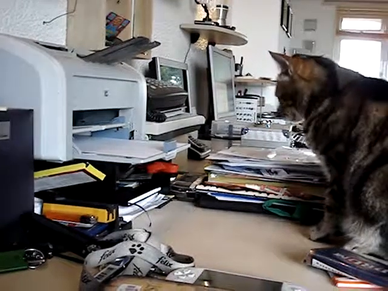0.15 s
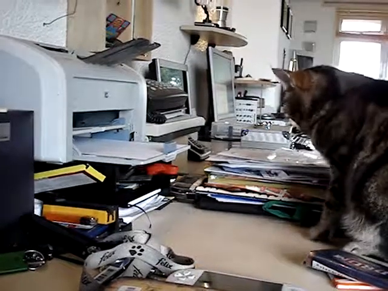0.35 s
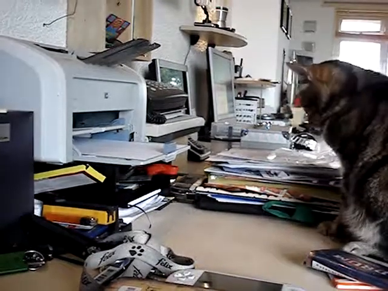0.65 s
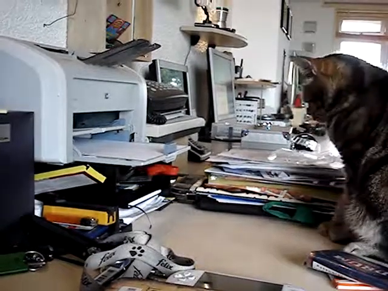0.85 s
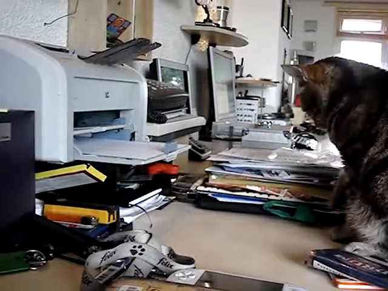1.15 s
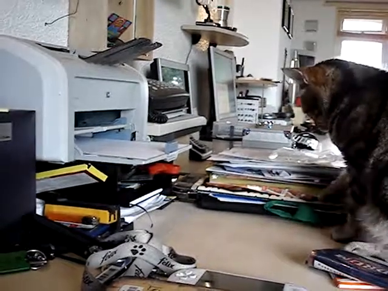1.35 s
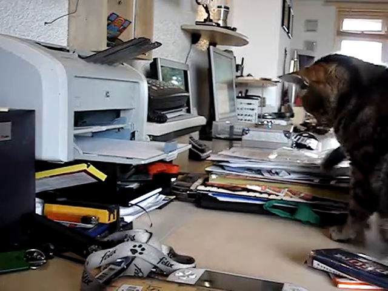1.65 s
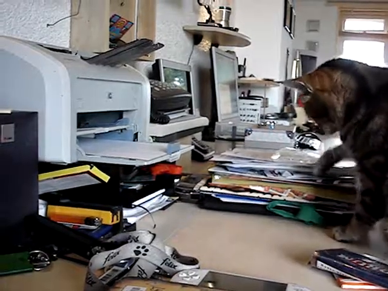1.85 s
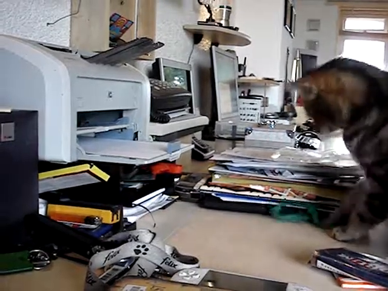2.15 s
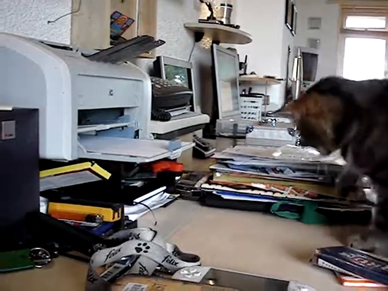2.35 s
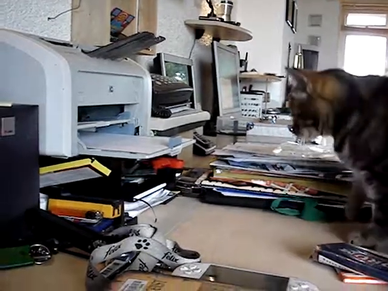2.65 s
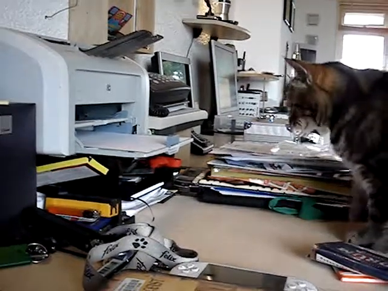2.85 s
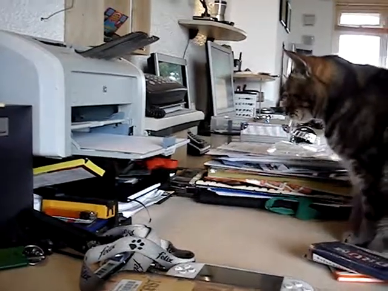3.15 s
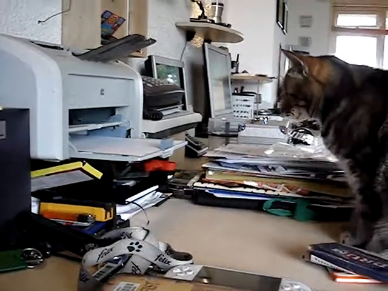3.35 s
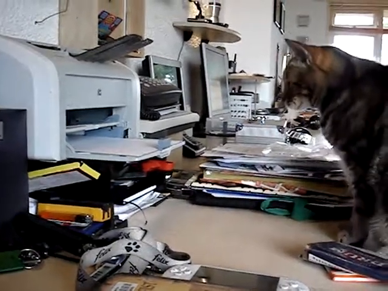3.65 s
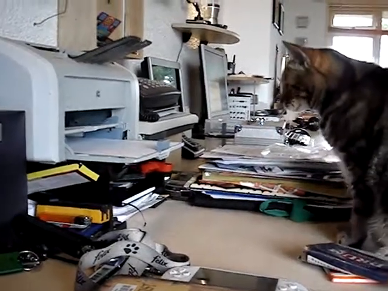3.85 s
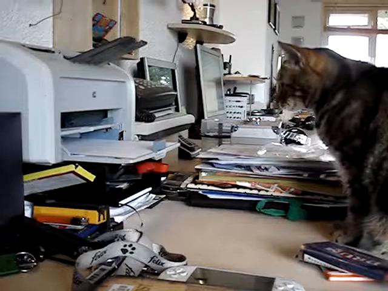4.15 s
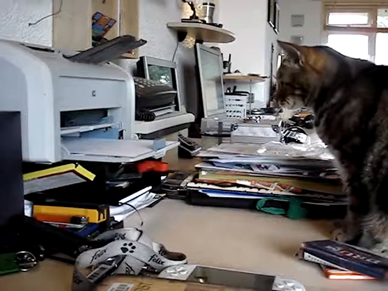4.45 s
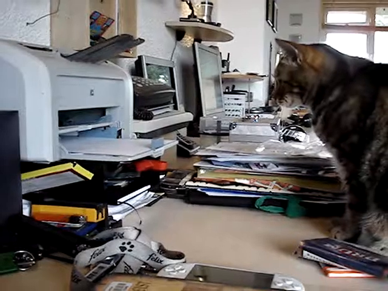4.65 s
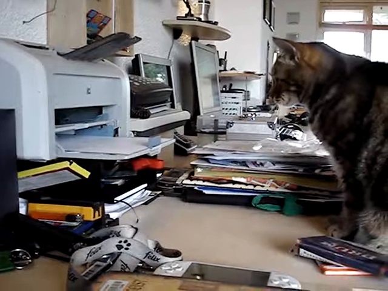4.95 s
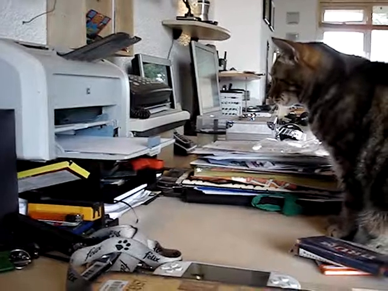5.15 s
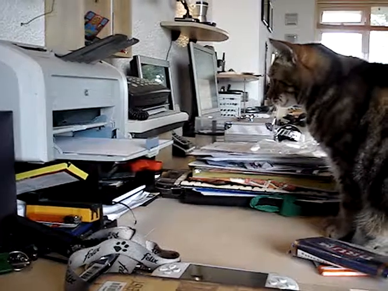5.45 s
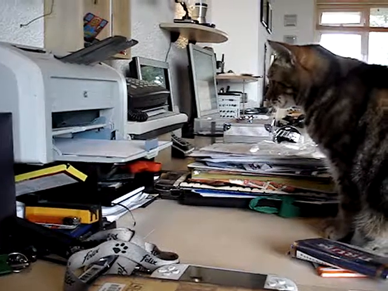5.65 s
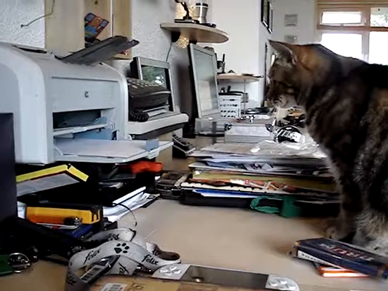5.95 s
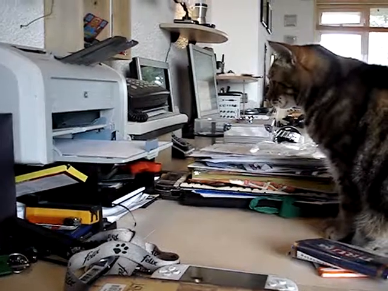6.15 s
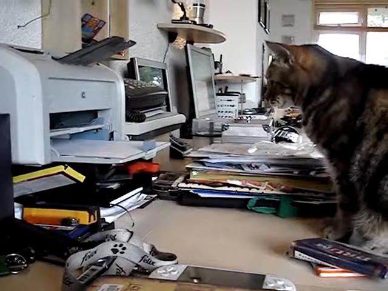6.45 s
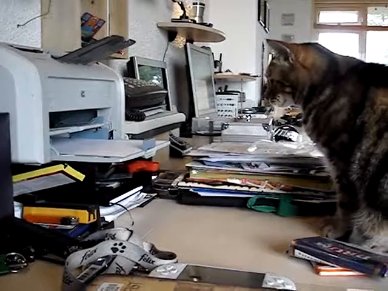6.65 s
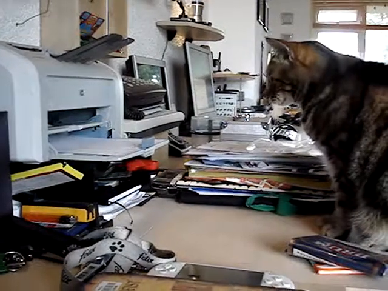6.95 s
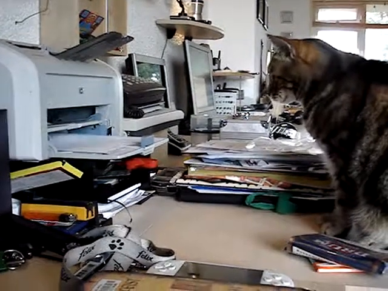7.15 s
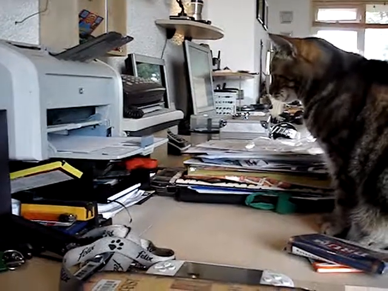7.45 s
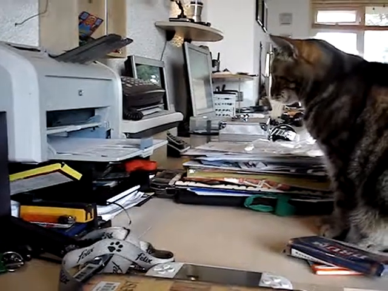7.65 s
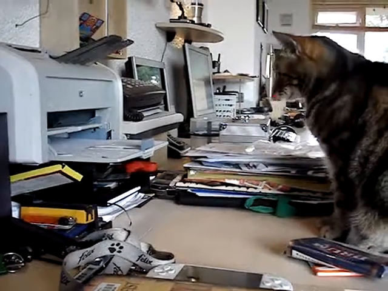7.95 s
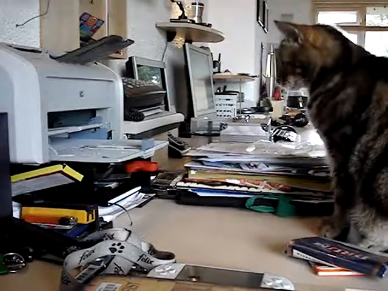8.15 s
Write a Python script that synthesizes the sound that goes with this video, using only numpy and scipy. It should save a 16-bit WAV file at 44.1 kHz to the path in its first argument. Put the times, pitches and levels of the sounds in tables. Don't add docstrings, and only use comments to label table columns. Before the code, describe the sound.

Close capture of a small printer on a desk: a steady mid-pitched motor hum with gritty gear rumble, a loud latch crack, a stop, and a quiet fan-filled gap. Mechanical clicks lead into a fast rising whine, joined by an electrical tone and a thin high singing line. A burst of roller clatter draws in rustling paper, with more snaps and knocks, short room echoes around them, and the motor still running at the end.

```python
import sys
import numpy as np
from scipy import signal
from scipy.fft import rfft, irfft, next_fast_len
from scipy.io import wavfile
from scipy.ndimage import uniform_filter1d, map_coordinates

SR = 44100
rng = np.random.default_rng(int(sys.argv[2]) if len(sys.argv) > 2 else 0)


def volts_from_db(level):
    exponent = np.asarray(level, float) / 20
    return 10 ** exponent


def dump(signal):
    limited = np.clip(np.atleast_2d(signal).T, -1, 1)
    pcm = np.round(limited * 32767).astype(np.int16)
    wavfile.write(sys.argv[1], SR, pcm)


N = 366030


def evened(x):
    return x / np.sqrt(np.mean(x ** 2) + 1e-20)


def peaked(x):
    return x / np.sqrt(uniform_filter1d(x ** 2, 200).max() * 4)


def read(points, hz):
    f, value = np.transpose(points)
    return np.interp(np.log(hz + 1), np.log(f + 1), value)


def add(mix, s, sound):
    part = mix[max(round(s * SR), 0):][:len(sound)]
    part += sound[:len(part)]


def columns(rows, fade_s):
    s, *cols = np.transpose(rows)
    t = np.arange(s[0], s[-1], 1 / SR)
    since_on = t - s[0] + (s[0] < .02)
    until_off = s[-1] - t + (s[-1] > 8.25)
    gate = np.clip(np.minimum(since_on, until_off) / fade_s, 0, 1)
    return s[0], gate, [np.interp(t, s, c) for c in cols]


def span(start_s, stop_s, fade_s):
    s, gate, _ = columns([(start_s,), (stop_s,)], fade_s)
    return s + np.arange(len(gate)) / SR, gate


def coloured(x, points):
    size = next_fast_len(len(x))
    gain = volts_from_db(read(points, np.fft.rfftfreq(size, 1 / SR)))
    return evened(irfft(rfft(x, size) * gain, size)[:len(x)])


def band(x, lo_hz, hi_hz):
    return signal.sosfilt(signal.butter(2, [lo_hz, hi_hz], "bandpass", fs=SR, output="sos"), x)


def ring(x, hz, width_hz):
    return signal.lfilter(*signal.iirpeak(hz, hz / width_hz, SR), x)


def slow(size, hz):
    knots = rng.standard_normal(4000)
    coarse = np.arange(0, size + 16, 16)
    curve = map_coordinates(knots, [coarse * hz / SR % 3990], order=3)
    return evened(np.interp(np.arange(size), coarse, curve))


def tone(hz, waver_db=0., waver_hz=9.):
    turn = 2 * np.pi * (np.cumsum(hz) / SR + rng.random())
    return np.sqrt(2) * np.sin(turn) * volts_from_db(waver_db * slow(len(hz), waver_hz))


# time_s, whine_db
MOTOR_RUNS = [
    [(0.0, -39.5), (.77, -42), (1.2, -39), (1.5, -41), (2.55, -40.5)],
    [(3.87, -42.5), (4.2, -42), (4.6, -45.5), (4.95, -42), (5.6, -44.5), (6.5, -43.5), (7.6, -43.5),
     (8.3, -45)],
]
# step_rate_hz, warming_creep_hz_per_s
MOTOR_SPEEDS = [
    (504.7, 0),
    (502.2, .4),
]
# second_multiple_db, fourth_multiple_db, whine_sway_db
UPPER_WHINE = [
    (-51.5, -57, 0),
    (-51, -64.5, 1.5),
]
# multiple_of_step_rate, level_db, waver_width_hz
GEAR_MESHES = [(.26, -63, 6), (.348, -59, 13), (.4165, -55, 4.4), (.583, -75, 4.2), (1.04, -81, 4.8),
               (1.418, -58, 6), (1.666, -64, 4.4), (1.8, -61, 15), (2.167, -62, 6.2), (2.54, -63.5, 11),
               (2.91, -68, 6), (3.5, -87.5, 21), (5.22, -70.5, 5), (6, -81, 3.8), (8, -69.5, 3.6),
               (9, -84, 18)]
BEAT_S, BEAT_DIP_S, BEAT_END_S, BEAT_SHARE = .217, .185, 1.52, .85


def motor_whine():
    out = np.zeros(N)
    for rows, (step_hz, creep), (db2, db4, sway_db) in zip(MOTOR_RUNS, MOTOR_SPEEDS, UPPER_WHINE):
        s, gate, (db1,) = columns(rows, .012)
        t = s + np.arange(len(gate)) / SR
        hz = step_hz + creep * (t - s) + .3 * slow(len(t), 6.)
        beat = np.exp(2j * np.pi * (t - BEAT_DIP_S) / BEAT_S)
        throb = abs(1 - BEAT_SHARE * (t < BEAT_END_S) * beat)
        sway = volts_from_db(sway_db * slow(len(hz), 7.))
        whine = volts_from_db(db1) * sway * tone(hz, .5, 30.)
        whine += volts_from_db(db2) * tone(2 * hz, 1.6, 14.)
        whine += volts_from_db(db4) * throb * tone(4 * hz, 1., 25.)
        for multiple, db, width in GEAR_MESHES:
            mesh_hz = multiple * hz + 0.4 * width * slow(len(hz), width)
            whine += volts_from_db(db) * tone(mesh_hz, 3.05, width)
        add(out, s, whine * gate)
    return out


# start_s, stop_s, rumble_db, db_added_until_up_to_speed
GEAR_TURNS = [
    (0.0, 2.56, -48.5, 0.5),
    (3.64, 8.3, -48.5, -4),
]
# time_s, extra_db
ROLLER_STRAINS = [
    (2.22, 1.5),
    (3.64, 3.2),
    (4.13, 1.3),
    (6.69, 4.4),
    (7.31, 5),
]
# pitch_hz, level_db_per_hz
CASING_SPECTRUM = [(35, -47), (60, -31.5), (195, -17.5), (439, -12), (499, -7.5), (646, -14), (1010, -14.5),
                   (1370, -21.5), (2050, -21), (2230, -23.5), (6950, -33.5), (7900, -42.5), (10000, -35.5),
                   (13000, -73), (22000, -120)]
UP_TO_SPEED_S, STRAIN_S = 0.32, 0.074


def gear_rumble():
    out = np.zeros(N)
    for start, stop, db, lack_db in GEAR_TURNS:
        t, gate = span(start, stop, 0.042)
        db = db + lack_db * np.clip(1 - (t - start) / UP_TO_SPEED_S, 0, 1)
        db += sum(extra_db * np.exp(-((t - s) / STRAIN_S) ** 2) for s, extra_db in ROLLER_STRAINS)
        unevenness_db = 0.4 * slow(len(db), 24.84) + 0.61 * slow(len(db), 160.)
        teeth = rng.standard_normal(len(db)) * volts_from_db(unevenness_db)
        add(out, start, volts_from_db(db + 3.0) * gate * coloured(teeth, CASING_SPECTRUM))
    return out


# on_s, off_s, level_db
CHARGER_TONES = [
    (0.0, 0.327, -42.5),
    (4.0, 8.293, -43),
]
CHARGER_HZ, SAG_FROM_S, SAG_DB_PER_S = 1226.6, 6.8, 2.0


def charger():
    out = np.zeros(N)
    for on, off, db in CHARGER_TONES:
        t, gate = span(on, off, .005)
        sag_db = SAG_DB_PER_S * np.maximum(t - SAG_FROM_S, 0)
        level = volts_from_db(db - sag_db + .6 * slow(len(t), 5.5))
        add(out, on, level * gate * tone(CHARGER_HZ + 0 * t, 0.52, 18.0))
    return out


# pitch_hz, level_db_per_hz
FAN_AIR = [(15, -55), (25, -12), (58, -16.5), (91, -14), (229, -12), (264, -7), (444, -10.5), (575, -6),
           (632, -9), (839, -13.5), (1170, -14.5), (1280, -17), (4580, -25.5), (7000, -28.5), (9100, -65),
           (15400, -120)]
# pitch_hz, level_db
STEADY_TONES = [(263.8, -63), (592.2, -59), (796.7, -64), (909.8, -66.5), (1179, -63.5), (2331, -73),
                (2880, -77), (3332, -85), (5760, -78), (7843, -79), (7876, -66), (8010, -73.5)]
FAN_AIR_DB, HISS_DB = -46, -59


def idle_room():
    air = coloured(rng.standard_normal(N), FAN_AIR) * volts_from_db(FAN_AIR_DB - 3.0 + 0.8 * slow(N, 4.27))
    air += volts_from_db(HISS_DB) * evened(band(rng.standard_normal(N), 4700, 15000))
    air += volts_from_db(-62.0) * evened(ring(rng.standard_normal(N), 7840, 310))
    for hz, db in STEADY_TONES:
        wavers = hz < 5000
        air += volts_from_db(db) * tone(hz + 4 * wavers * slow(N, 14.), 3 * wavers, 25.)
    return air


def chatter(rise_s, t60_s):
    t = np.arange(8000) / SR
    build = 1 - np.exp(-t / np.clip(rise_s, .0005, .03))
    decay = volts_from_db(-60 * t / np.clip(t60_s, .015, .3))
    struck_now = rng.random(len(t)) < 500 / SR
    impacts = struck_now * rng.choice([-1., 1.], len(t)) * rng.uniform(5, 13, len(t))
    scrape = rng.standard_normal(len(t)) * volts_from_db(1.7 * slow(len(t), 326.0))
    return (scrape + impacts) * build * decay


# time_s,
# lever_peak_db, panel_ring_hz, thud_db, t60_s
KNOCKS_WITH_DECAY = [(0.857, -44, 500.5, 5, .071), (1.5994, -41, 495, 12, .045), (1.7379, -46, 506, 7, .1),
                     (2.1515, -24, 510, -6, 0.096), (2.1724, -29, 510, -17, .11), (2.5388, -38, 507, 6, .09),
                     (2.5594, -42, 665, 7.5, 0.16), (3.4922, -33, 536, -1, .054), (3.5094, -38, 533, 7, 0.12),
                     (3.543, -43, 560, 8, .1), (3.6395, -39.5, 480, 9, 0.046), (3.6579, -47.5, 304, 17, .065),
                     (3.7183, -49, 435, 16, .074), (3.8434, -45, 460, 18.5, 0.073), (3.8774, -44, 500, 9, 0.15),
                     (7.2255, -24.5, 687, 3, .036), (7.2395, -29, 515, 2, .062), (7.6285, -20, 900, 2, 0.088),
                     (7.6483, -17.5, 447, -4, .1), (7.6658, -36, 490, 3, .1)]
# time_s, lever_peak_db, panel_ring_hz, thud_db
ROLLER_CLATTER = [(6.5209, -27.5, 386, 10), (6.5324, -18, 734, -1.5), (6.5557, -24, 905, 4.5),
                  (6.5731, -20, 1000, 3), (6.5944, -29.5, 721, 10), (6.615, -42, 500, -4),
                  (6.6488, -18.5, 726, -5.5), (6.6646, -27.5, 810, -17), (6.6795, -27.5, 503, 3.5),
                  (6.7311, -24, 950, -1), (6.7598, -25.5, 514, -1), (6.7792, -30.5, 498, -1),
                  (6.8087, -33.5, 514, 3), (7.1497, -30, 490, -4), (7.3043, -30, 510, -7),
                  (7.5044, -41, 720, 10), (7.5244, -29, 495, 1.5), (7.5869, -31.5, 490, 3),
                  (8.1502, -44, 406, 2)]
# pitch_hz, width_hz, level_db
LEVERS = [(1380, 87, -2.5), (1900, 1040, 8.5), (2450, 890, -0.5), (2700, 120, -14.5)]
KNOCK_RISE_S, CLATTER_T60_S = 0.0051, .075


def knock(db, panel_hz, thud_db, t60_s=CLATTER_T60_S):
    blow = chatter(KNOCK_RISE_S, t60_s)
    thud = ring(blow, np.clip(panel_hz, 200, 1500), 100.0) + 0.28 * band(blow, 310, 990)
    levers = sum(volts_from_db(d) * ring(blow, f * rng.uniform(0.944, 0.948), w) for f, w, d in LEVERS)
    lever_part = peaked(band(levers, 990, 3740))
    thud_part = volts_from_db(thud_db) * peaked(band(thud, 130, 1200))
    return volts_from_db(db - 2.0) * (lever_part + thud_part)


# time_s, peak_db, pitch_hz, t60_s
PART_RINGS = [(.857, -39, 1260, 0.1), (.857, -42, 920, .1), (2.153, -38, 720, 0.05),
              (2.54, -36, 4770, 0.05), (2.54, -36.5, 3410, 0.062), (2.55, -39, 622, .12),
              (2.568, -48, 4800, 0.05), (3.491, -31, 532, 0.11), (3.493, -37, 909, 0.16),
              (3.546, -34, 562, 0.15), (3.642, -31, 297.5, 0.21), (3.641, -36, 470, 0.046),
              (6.52, -28, 890, 0.041), (3.645, -40, 181, 0.13), (3.74, -38, 587, 0.11),
              (3.846, -39, 870, .09), (6.52, -24, 374, 0.078), (6.538, -18, 1794, 0.044),
              (6.65, -28, 2676, 0.069), (6.733, -32.5, 4800, 0.046), (6.74, -30, 2700, 0.074),
              (6.762, -31, 1996, 0.091), (7.224, -21.5, 705, 0.041), (7.224, -22, 4510, 0.021),
              (7.507, -41, 710, .1), (7.185, -36, 3850, .06), (3.7, -39, 431, .25), (7.632, -45, 912, 0.19),
              (8.15, -41, 404, .15)]


def part_ring(db, hz, t60_s):
    t = np.arange(12000) / SR
    rise = np.minimum(t * hz, 1)
    return volts_from_db(db - 60 * t / t60_s) * rise * np.sin(2 * np.pi * hz * t)


# time_s, peak_db, centre_hz, t60_s
LATCH_SNAPS = [(0.9234, -37, 3000, .054), (1.858, -39, 4240, .07), (2.1519, -11.5, 3960, 0.031),
               (2.1644, -12.5, 5030, .077), (2.1734, -19, 5680, .051), (2.1894, -31, 5250, .07),
               (2.2044, -26, 4680, 0.042), (2.2232, -24, 4070, .057), (2.2344, -40, 4440, 0.034),
               (2.5394, -30, 3600, .07), (2.5665, -37, 3360, .083), (3.4907, -24.5, 4300, .07),
               (6.5186, -28, 3890, .04), (6.532, -20.5, 3250, 0.036), (6.5894, -35, 3390, .07),
               (6.649, -31, 3400, .07), (6.7298, -19, 3550, 0.044), (6.7464, -26, 5200, .04),
               (6.7605, -24.5, 4300, 0.046), (7.165, -27, 3750, 0.27), (7.2245, -12, 4800, .025),
               (7.3087, -26, 4440, 0.19), (7.359, -21, 4700, .03), (7.627, -23, 4300, .051),
               (7.647, -15, 3180, .06), (7.668, -26, 2900, .12)]
# pitch_hz, level_db_per_hz
CRACK_SPECTRUM = [(1470, -47), (2500, -3.5), (4370, -4.5), (5830, -3.5), (7250, -10.5), (7970, -8),
                  (9500, -11.5), (10200, -15.5), (13300, -48), (22000, -120)]
SNAP_RISE, WIDE_AT_3K, WIDE_PER_KHZ = 0.036, 0.47, 0.17


def snap(db, centre_hz, t60_s):
    blow = chatter(SNAP_RISE * t60_s, t60_s)
    wide = np.clip(WIDE_AT_3K + WIDE_PER_KHZ * (centre_hz / 1000 - 3), 0, 1)
    narrow = ring(ring(blow, centre_hz, 1300.), centre_hz, 1300.)
    return volts_from_db(db - 7.0) * peaked((1 - wide) * evened(narrow) + wide * coloured(blow, CRACK_SPECTRUM))


# time_s, pitch_hz, level_db
MIRROR_SPELLS = [
    [(1.51, 2022, -58), (1.56, 1995, -58), (1.64, 1940, -68)],
    [(5.07, 1950, -66), (5.14, 1992, -57), (5.22, 2018, -63), (5.5, 2022.5, -59.5), (8.3, 2022.5, -61)],
]
MIRROR_DB = -1


def mirror():
    out = np.zeros(N)
    for rows in MIRROR_SPELLS:
        s, gate, (hz, db) = columns(rows, .015)
        add(out, s, volts_from_db(db + MIRROR_DB) * gate * tone(hz, 1.5, 9.9))
    return out


# time_s, step_rate_hz, whine_db
MOTOR_START = [
    (3.645, 297.6, -56),
    (3.73, 304, -55),
    (3.77, 339, -55),
    (3.81, 409, -47),
    (3.845, 467, -44),
    (3.875, 497, -41),
]


def motor_run_up():
    out = np.zeros(N)
    s, gate, (hz, db) = columns(MOTOR_START, 0.0073)
    hz = hz * (1 + .008 * slow(len(hz), 60.))
    strands = tone(hz, 2., 45.)
    strands += volts_from_db(-7) * tone(1.42 * hz, 4., 40.)
    strands += volts_from_db(-6) * tone(2 * hz, 4., 40.)
    add(out, s, volts_from_db(db) * gate * strands)
    return out


# time_s, rustle_db, brightness_db
SHEET_SLIDE = [
    (6.45, -56, -7),
    (6.562, -55, -14),
    (6.696, -56.5, -17),
    (6.96, -52, -13),
    (7.532, -53, -22),
    (7.8, -56, -17),
    (8.3, -57.5, -27),
]


def sheet():
    out = np.zeros(N)
    s, gate, (db, bright_db) = columns(SHEET_SLIDE, 0.074)
    clumps_db = 1.4 * slow(len(db), 330.0) + 0.5 * slow(len(db), 34.8)
    grains = rng.standard_normal(len(db)) * volts_from_db(clumps_db)
    body = evened(band(grains, 830, 5200))
    bright = volts_from_db(bright_db) * evened(band(grains, 3350, 8700))
    add(out, s, volts_from_db(db + 7.0) * gate * (body + bright))
    return out


ROOM_T60_S, ROOM_DB = 0.42, -11.5


def room(x):
    taps = np.zeros(SR // 2)
    at = np.arange(200, len(taps) - 20, 20)
    taps[at + rng.integers(0, 20, len(at))] = rng.choice([-1., 1.], len(at))
    t = np.arange(len(taps)) / SR
    low = signal.sosfilt(signal.butter(1, 2500, fs=SR, output="sos"), taps)
    tail = low * volts_from_db(-60 * t / ROOM_T60_S)
    tail += (taps - low) * volts_from_db(-60 * t / (0.67 * ROOM_T60_S))
    return x + volts_from_db(ROOM_DB) * signal.oaconvolve(x, tail / np.linalg.norm(tail))[:N]


def scene():
    hits = np.zeros(N)
    blows = ((KNOCKS_WITH_DECAY, knock), (ROLLER_CLATTER, knock), (LATCH_SNAPS, snap), (PART_RINGS, part_ring))
    for table, source in blows:
        for s, *row in table:
            add(hits, s - .0012, source(*row))
    echoing = room(hits + gear_rumble() + sheet())
    direct = motor_whine() + motor_run_up() + mirror() + charger() + idle_room()
    return (echoing + direct)[None]


# time_s, length_s, from_hz, to_hz
TREBLE_GAPS = [(2.513, .022, 7200, 9400), (6.505, .011, 2200, 10300), (6.719, .011, 3200, 10300),
               (7.232, .025, 6400, 9300), (7.232, .025, 4300, 5200), (7.335, .022, 4600, 5400),
               (7.62, .007, 3000, 10300), (7.626, .02, 9000, 10300)]


def thrifty_recorder(x):
    hz, t, z = signal.stft(x, SR, nperseg=256, noverlap=192)
    for s, length, lo_hz, hi_hz in TREBLE_GAPS:
        in_band = (hz > lo_hz) & (hz < hi_hz)
        z[:, in_band[:, None] & (t > s) & (t < s + length)] *= volts_from_db(-27)
    spells = np.minimum(.15 * volts_from_db(5 * slow(len(t), 1500.)), .35)
    lost = rng.random((len(hz) // 3 + 1, len(t) // 4 + 1)) < spells[::4][None]
    lost = np.repeat(np.repeat(lost, 3, axis=0), 4, axis=1)[:len(hz), :len(t)]
    z[:, lost & (hz > 4700)[:, None]] *= volts_from_db(-22)
    return signal.istft(z, SR, nperseg=256, noverlap=192)[1][:, :N]


def low_pass(x):
    return signal.sosfilt(signal.butter(12, 11050, fs=SR, output="sos"), x)


def record(dry):
    rounded = .3 * np.tanh(dry / .3)
    starved = thrifty_recorder(rounded)
    treble_limit = signal.firwin(801, 10040, window=("kaiser", 9), fs=SR)
    limited = signal.oaconvolve(starved, treble_limit[None], "same")
    return low_pass(limited)


dry = scene()
out = record(dry)
dump(out)
```